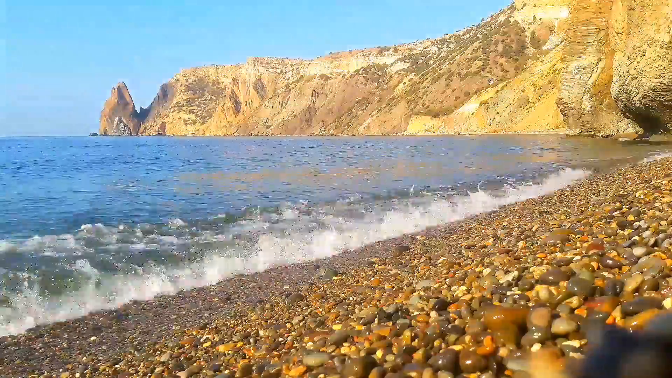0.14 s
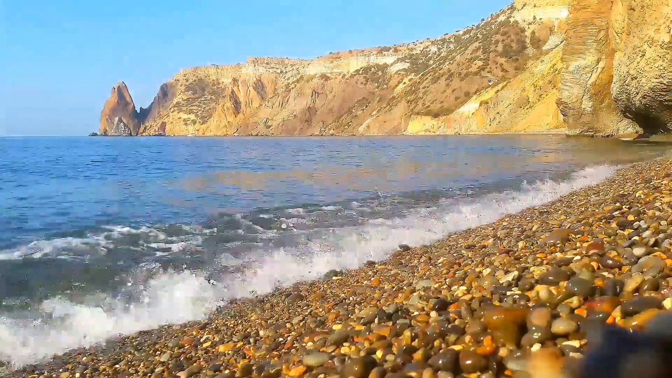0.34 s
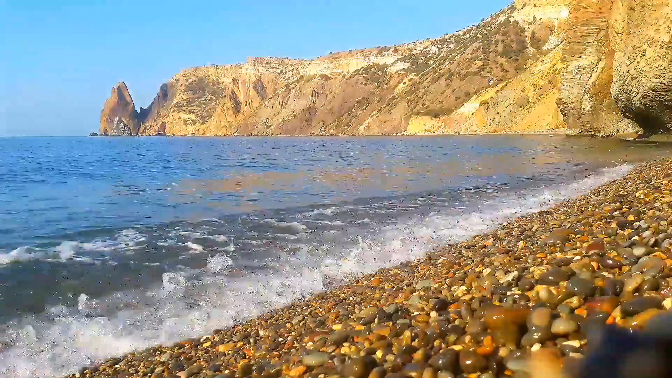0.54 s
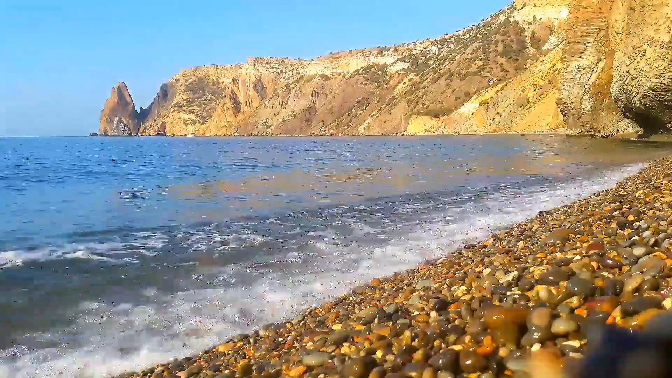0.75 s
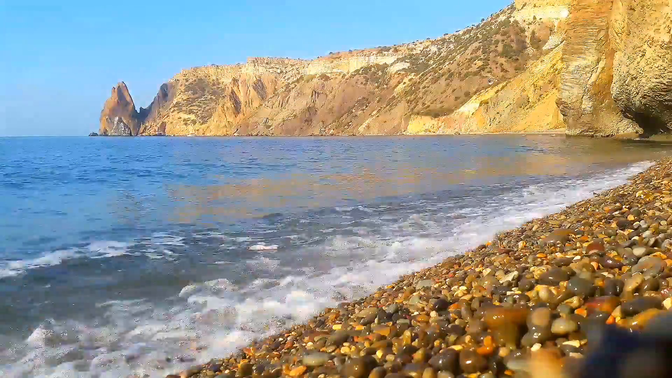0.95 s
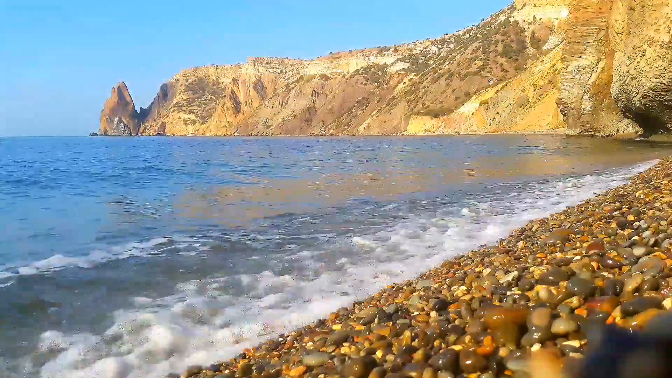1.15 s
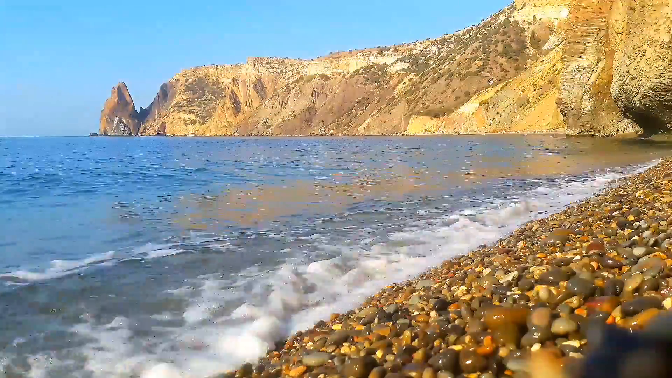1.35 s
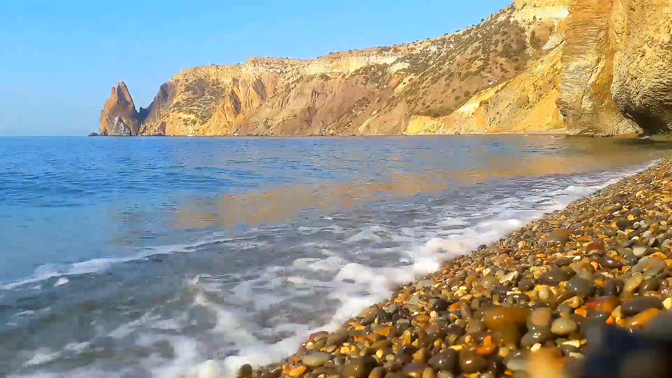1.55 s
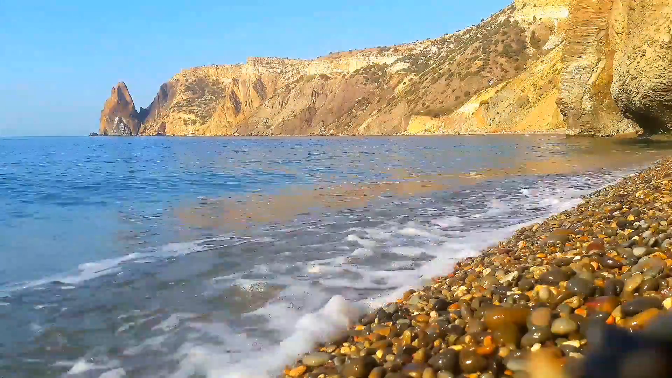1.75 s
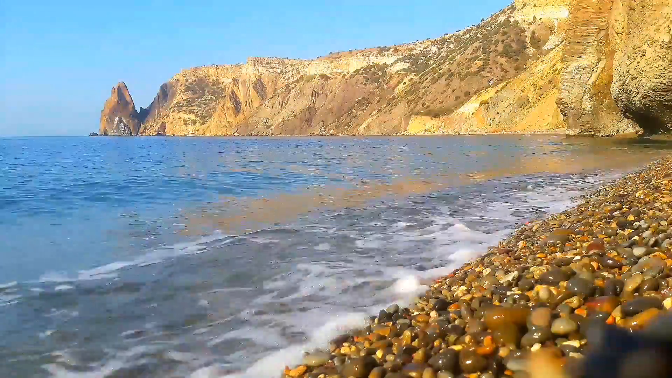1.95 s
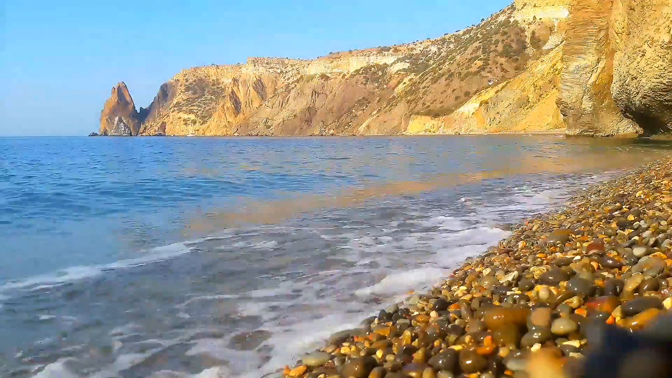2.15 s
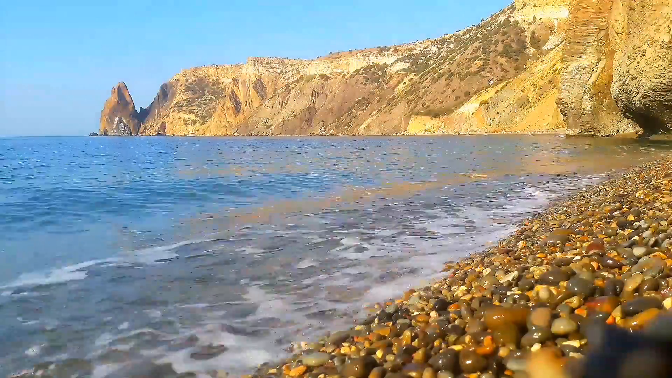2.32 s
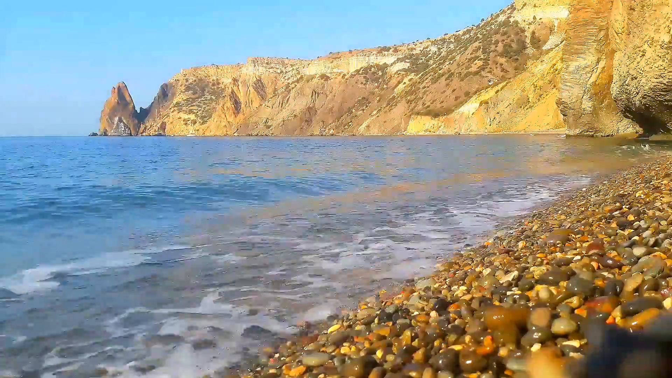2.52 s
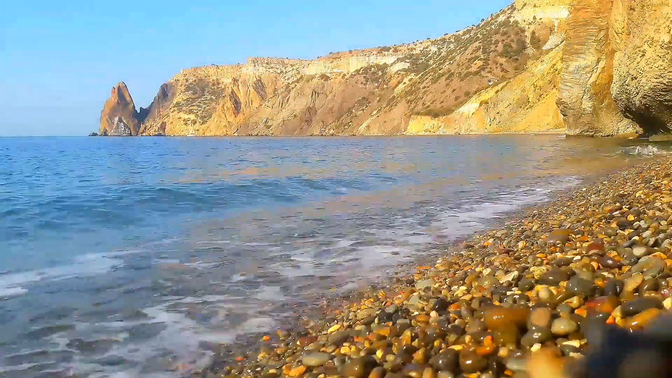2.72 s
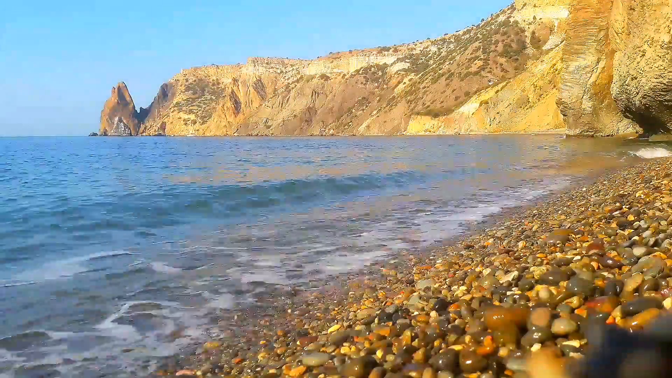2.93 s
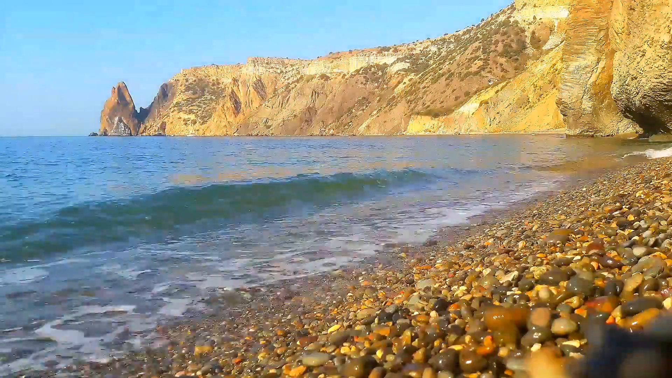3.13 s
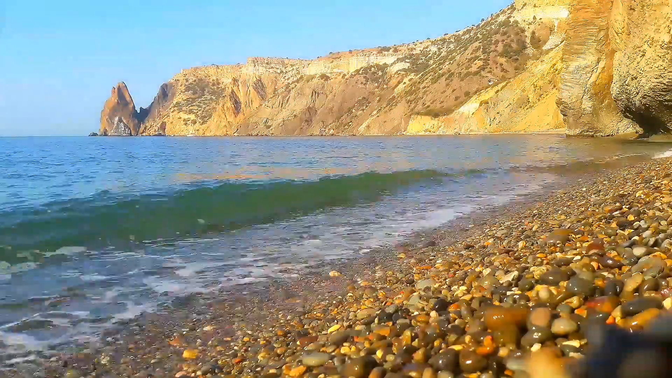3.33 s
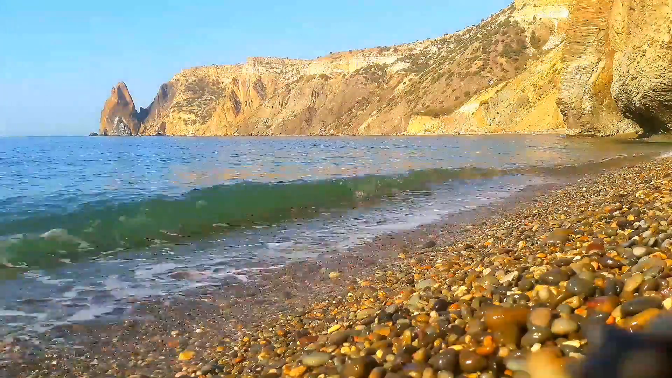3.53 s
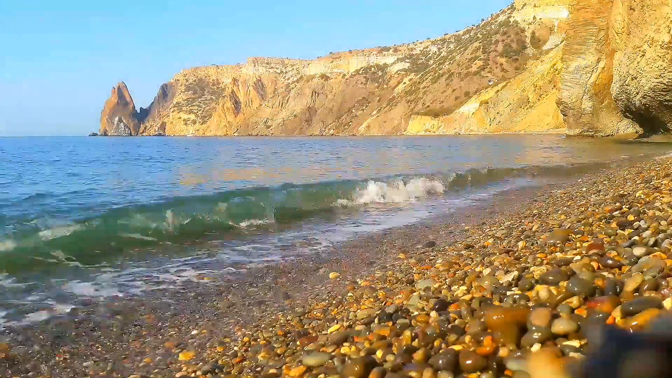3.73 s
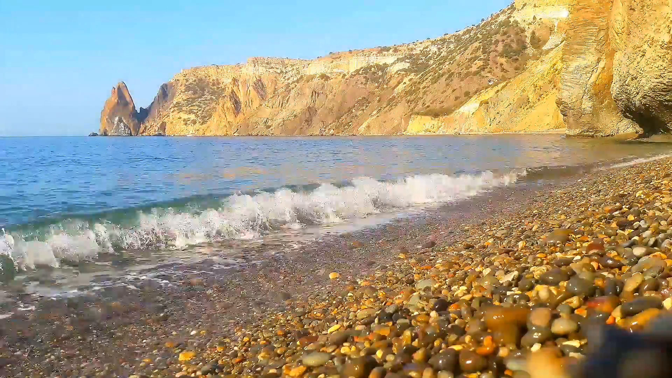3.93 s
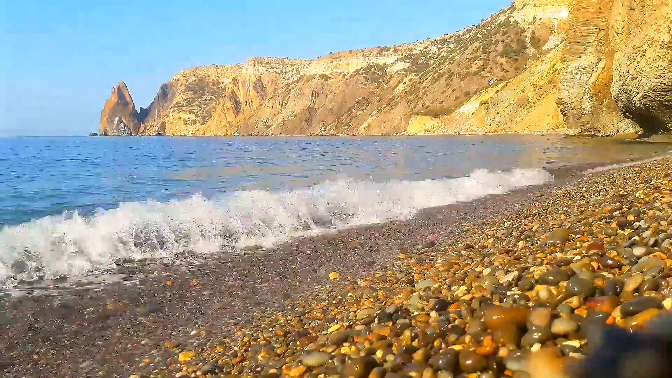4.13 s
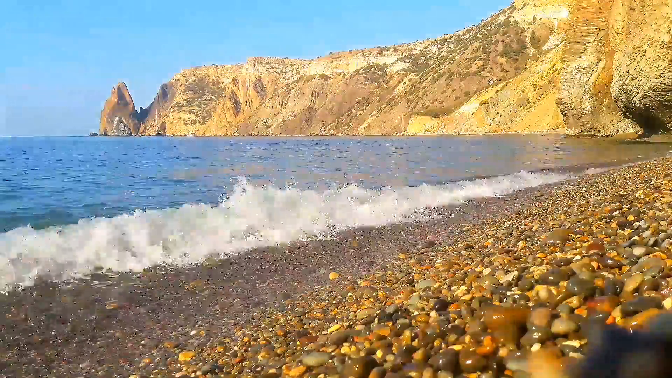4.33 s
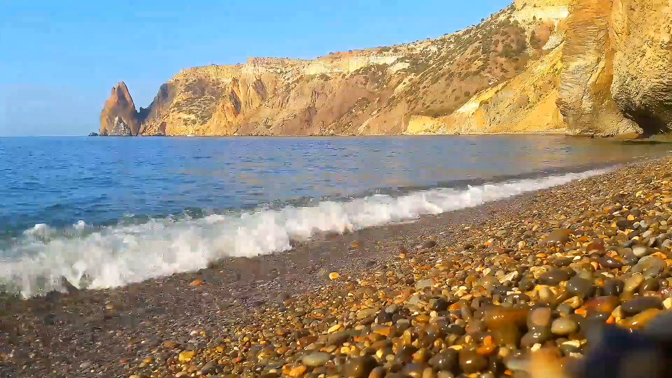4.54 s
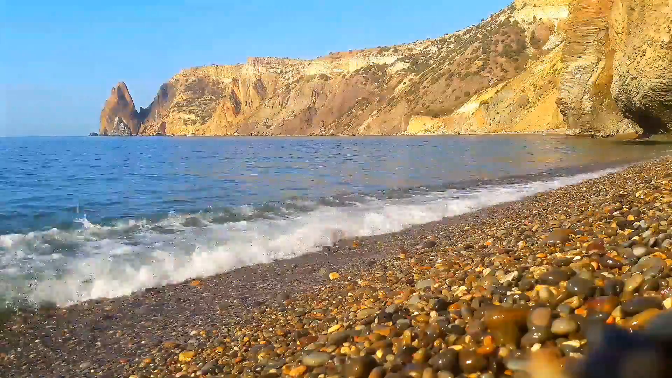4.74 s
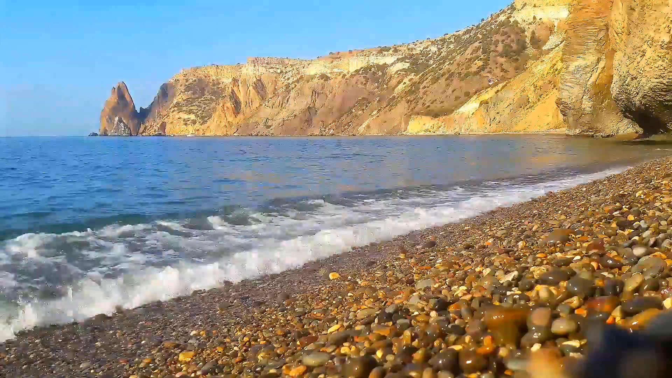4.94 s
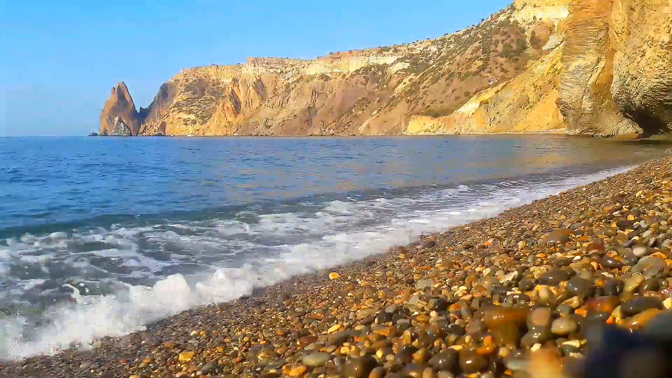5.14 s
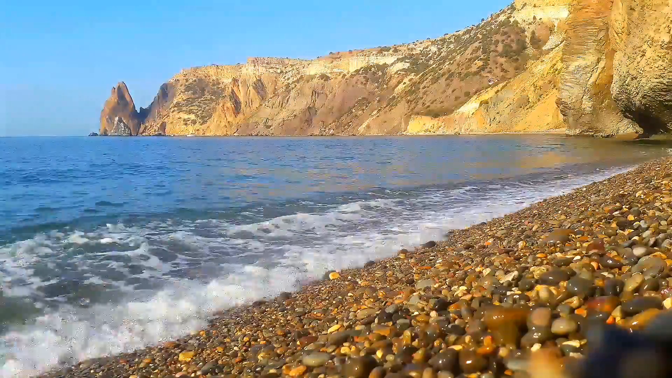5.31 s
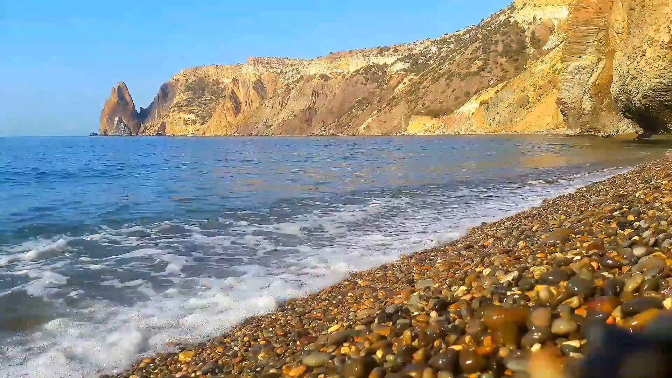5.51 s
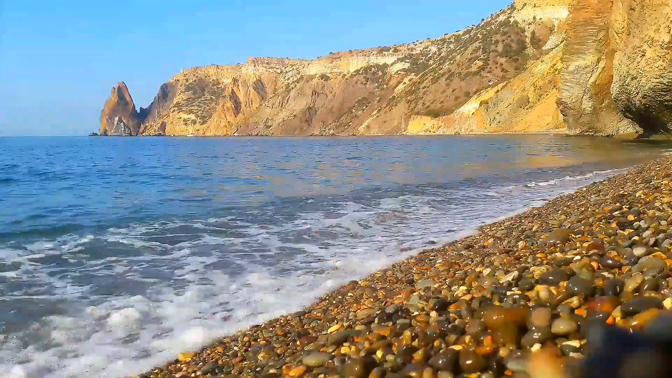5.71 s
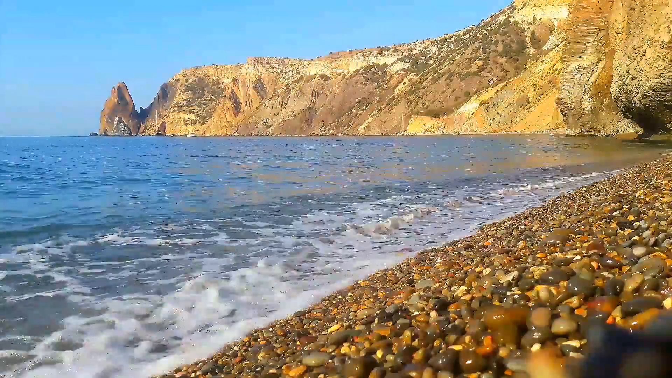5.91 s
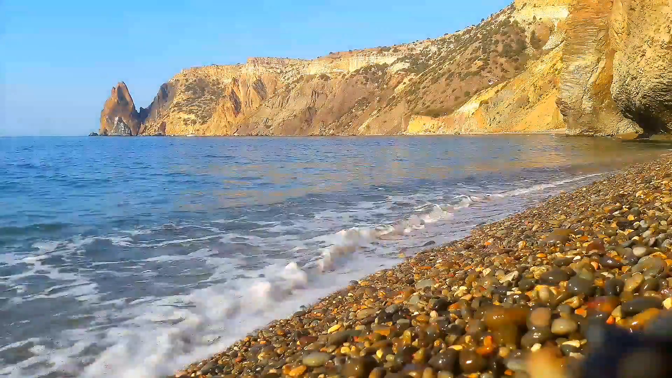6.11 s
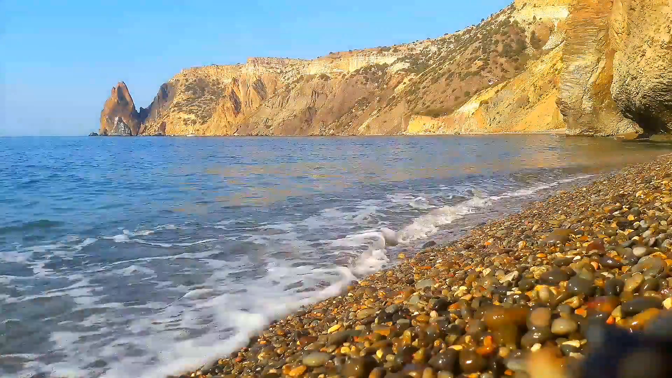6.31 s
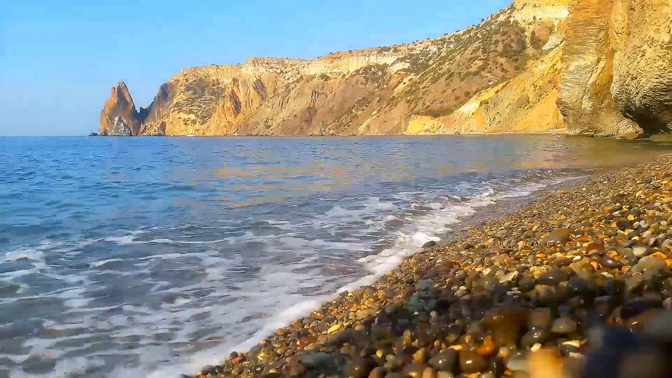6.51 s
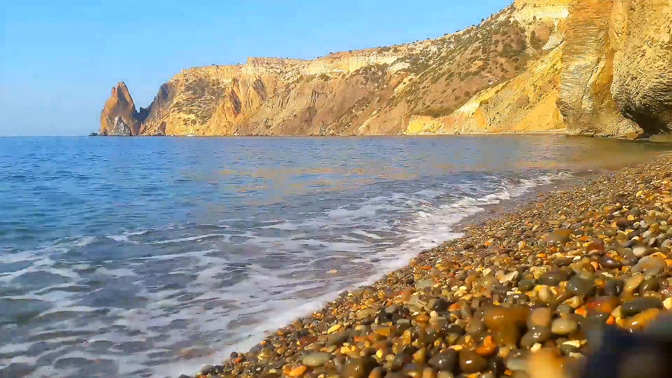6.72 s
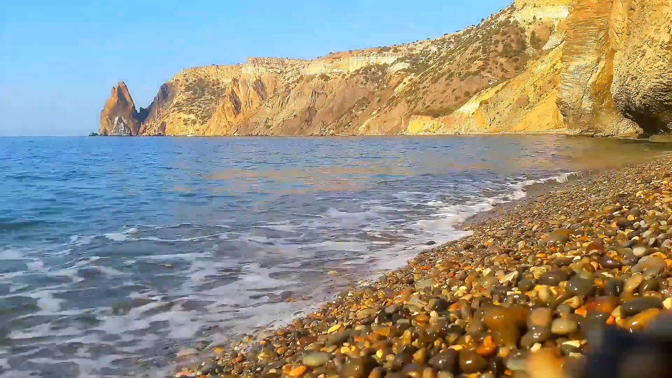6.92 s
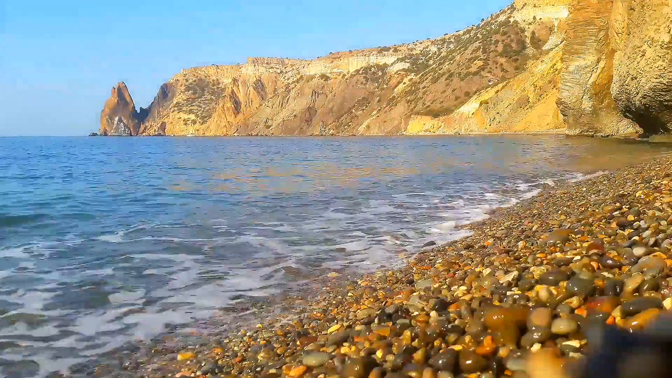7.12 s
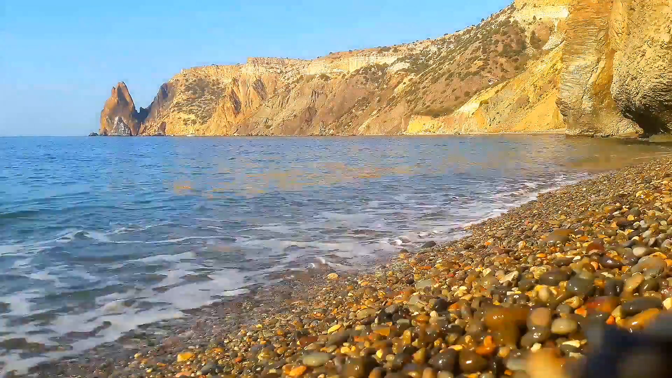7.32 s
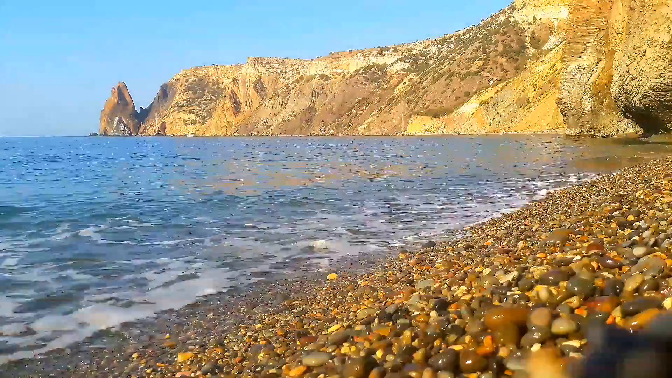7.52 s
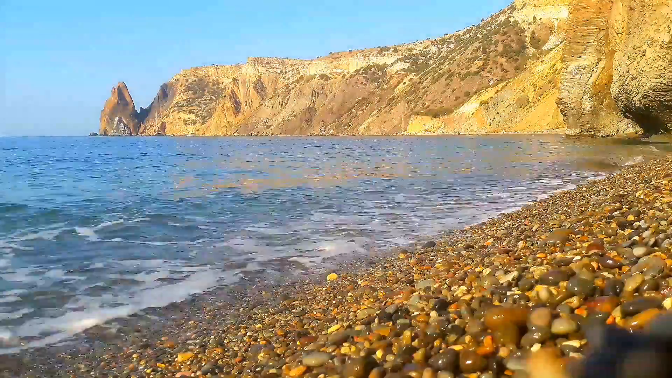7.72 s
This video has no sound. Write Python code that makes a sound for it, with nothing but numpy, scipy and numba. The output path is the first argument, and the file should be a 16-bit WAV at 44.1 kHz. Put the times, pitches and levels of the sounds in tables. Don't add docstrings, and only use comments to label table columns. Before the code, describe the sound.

Small sea waves break and wash over a pebble beach, roaring twice, with rattling stones, gurgling bubbles and fizzing foam between.

```python
import sys
import numpy as np
from scipy import signal
from scipy.fft import rfft, irfft, next_fast_len
from scipy.io import wavfile
from scipy.ndimage import uniform_filter1d
from numba import njit

SR = 44100
rng = np.random.default_rng(int(sys.argv[2]) if len(sys.argv) > 2 else 0)


def file_out(sig):
    cols = np.atleast_2d(sig).T
    lim = np.clip(cols, -1, 1)
    pcm = np.round(lim * 32767).astype(np.int16)
    wavfile.write(sys.argv[1], SR, pcm)


def volts_from_decibels(level):
    exponent = np.asarray(level, float) / 20
    return 10 ** exponent


N = 342216
T = np.arange(N) / SR
MS = T[::44]
PORT_LAG = 18.5
ECHO_LAG = 500

# t/s, water/0-1, pebbles/0-1
SHORE_WIDTH = [(0, 0.78, 0.65), (1.1, 0.58, 0.54), (1.25, 0.14, 0.06), (1.9, 0.6, 0.34), (2.8, 1, 0.22),
               (3.4, 0.7, 0.13), (3.68, 0.8, 0.2), (3.8, 0.94, 0.76), (4.7, 0.29, 0.53), (5.0, 0.43, 0.34),
               (5.5, 0.03, 0.02), (6.15, 0.5, 0.25), (7.2, 0.79, 0.35), (7.76, 1, .2)]


def curves(table):
    s, *columns = np.transpose(table)
    return [np.interp(T, s, c) for c in columns]


def unit(x):
    return x / np.sqrt(np.mean(x ** 2))


def colour(x, points):
    hz, db = np.transpose(points)
    size = next_fast_len(N)
    f = np.arange(1, size // 2 + 2) * SR / size
    gain = volts_from_decibels(np.interp(np.log(f), np.log(hz), db))
    return irfft(rfft(x, size) * gain, size)[..., :N]


def walk(rate):
    k = int(SR / rate)
    steps = rng.standard_normal(N // 200)
    held = steps[np.arange(N) // k]
    return unit(uniform_filter1d(uniform_filter1d(held, k), k))


def surges(s, hold_s, rise, db, fall):
    s, hold_s, rise, db = (np.reshape(c + 0 * s, (-1, 1)) for c in (s, hold_s, rise, db))
    before = np.maximum(s - MS, 0)
    after = np.maximum(MS - s - hold_s, 0)
    return volts_from_decibels(db - rise * before - fall * after) ** 2


def total_db(power, far_db):
    return np.interp(T, MS, 10 * np.log10(power.sum(axis=0) + volts_from_decibels(far_db) ** 2))


@njit
def rings(at, hz, cycles, size, right, lag, glide, n, pad):
    out = np.zeros((2, n + 2 * pad))
    for g in range(len(at)):
        w = 2 * np.pi * hz[g] / SR
        fade = hz[g] / cycles[g] / SR
        z = size[g] + 0j
        turn = np.exp(1j * w - fade)
        bend = np.exp(1j * w * glide[g] * fade)
        soft, onset = 1., np.exp(-w / 2)
        for i in range(at[g], min(at[g] + int(4.5 / fade), n)):
            v = z.imag * (1 - soft)
            out[0, i + pad] += v
            out[1, i + pad + lag[g]] += v * right[g]
            z *= turn
            turn *= bend
            soft *= onset
    return out[:, pad:n + pad]


def swarm(count, hz, octaves, cycles, scatter_db, glide, spread, stray, shade_db):
    when, where, tail, path = rng.random((count, 4)).T
    at = (when * N).astype(np.int64)
    pitch = (hz + 0 * T)[at] * 2 ** (octaves * rng.standard_normal(count))
    pitch = np.clip(pitch, 40, .4 * SR)
    end_on = np.cos(np.pi * np.clip(spread[at], 0, 1) * where)
    lag = np.where(path < stray, ECHO_LAG * (2 * where - 1), PORT_LAG * end_on)
    lag = np.round(lag).astype(np.int64)
    size = np.sqrt(pitch) * volts_from_decibels(scatter_db * np.minimum(-np.log(1 - tail), 4.5))
    right = volts_from_decibels(-shade_db * end_on)
    return unit(rings(at, pitch, cycles + 0 * tail, size, right, lag, glide + 0 * tail, N, ECHO_LAG))


def hits(table, gain_db, cycles, glide, lag, shade_db):
    s, db, hz = np.transpose(table)[:3]
    at = (s * SR).astype(np.int64)
    right = volts_from_decibels(0 * s - shade_db)
    lags = np.full(len(s), int(lag))
    return rings(at, hz, cycles + 0 * s, volts_from_decibels(db + gain_db), right, lags, glide + 0 * s, N, ECHO_LAG)


def surf():
    # arrives t/s, holds/s, rise/(dB/s), roar level/dB, wash level/dB
    breaks = [(0.237, 0.099, 24, -28, -24), (0.542, 0.21, 25, -33.5, -28.5), (0.85, 0.17, 25, -42, -33.5),
              (1.21, 0.24, 307, -38, -29), (1.498, 0.055, 60, -36.5, -41), (1.704, 0.077, 52, -54, -39.5),
              (1.957, .03, 36, -52.5, -57), (2.562, 0.23, 34, -50, -45), (2.997, 0.3, 13, -46, -48),
              (3.45, 0.12, 18, -54, -52), (3.83, 0.057, 297, -33.5, -33.5), (3.735, .04, 203, -61, -36),
              (3.947, 0.099, 110, -46, -27), (4.191, 0.23, 45, -27, -28), (4.42, 0.087, 44, -23.5, -24),
              (4.682, 0.061, 26, -34, -30), (4.97, 0.22, 161, -38, -25), (5.174, 0.2, 42, -29, -24),
              (5.546, 0.074, 33, -43, -33.5), (6.155, 0.36, 34, -46, -46), (6.55, 0.33, 18, -45.5, -49),
              (6.995, 0.11, 12, -53.5, -49), (7.35, .15, 17, -52, -53), (7.68, .05, 23, -47, -55)]
    # t/s, pitch shift/octaves
    bubble_pitch = [(0, -0.02), (.3, -0.031), (.7, 0.06), (1.05, 0.16), (1.3, -0.035), (2.0, 0.06),
                    (2.9, -0.05), (3.3, -0.53), (3.66, -0.68), (3.72, .5), (3.85, 0.04), (4.3, -0.08),
                    (4.7, -0.11), (4.95, 0.01), (5.25, -0.08), (5.6, 0.01), (5.9, 0.07), (6.2, -0.15),
                    (7.0, -0.18), (7.76, -0.07)]
    s, hold_s, rise, roar_db, wash_db = np.transpose(breaks)
    boom_late_s, boom_under_roar_db = 0.041, 14.5
    boom_power = surges(s + boom_late_s, hold_s, rise, roar_db - boom_under_roar_db, fall=62)
    boom_level = total_db(boom_power, far_db=-63)
    roar_level = total_db(surges(s, hold_s, rise, roar_db, fall=66), far_db=-73.5)
    wash_level = total_db(surges(s, hold_s, rise, wash_db, fall=34.5), far_db=-53.5)

    wide = curves(SHORE_WIDTH)[0]
    boom = swarm(count=1200, hz=132.5, octaves=0.31, cycles=1.3, scatter_db=1.8, glide=.03,
                 spread=wide, stray=0.088, shade_db=.4)
    roar = swarm(count=12000, hz=383.4, octaves=0.567, cycles=2.3, scatter_db=1.25, glide=0.092,
                 spread=1.02 * wide, stray=.08, shade_db=0.5)
    wash_hz = 931 * 2 ** curves(bubble_pitch)[0]
    wash = swarm(count=26000, hz=wash_hz, octaves=0.509, cycles=1.9, scatter_db=0.46, glide=0.052,
                 spread=0.83 * wide, stray=.14, shade_db=2.0)

    churn = 0.4 * walk(7.1)
    boom = boom * volts_from_decibels(boom_level + 2.1 * walk(16))
    roar = roar * volts_from_decibels(roar_level + churn + 1.14 * walk(14))
    wash = wash * volts_from_decibels(wash_level + 1.5 + churn)
    return boom + roar + wash


def air_pockets():
    # t/s, peak/dB, f/Hz, fade/cycles
    thumps = [(0.09, -16.5, 97, 1.4), (0.201, -22, 118, 2.7), (.227, -10, 390, 5.8),
              (0.302, -7.5, 425, 3.2), (.449, -14.5, 215, 4.5), (.534, -9.5, 310, 5.3),
              (.675, -22, 96.5, 2.7), (0.854, -20, 89.5, 0.85), (1.23, -12, 202, 1.9),
              (1.227, -18, 133, 1.3), (1.365, -21, 90, 1.6), (1.413, -18, 109, 1.2),
              (2.09, -27.5, 109, 1.4), (2.549, -33, 106, 4.9), (3.01, -27, 120, 1.4),
              (3.811, -14, 316, 1.7), (3.764, -32, 161, 1.8), (3.858, -22, 170, 2), (3.893, -18, 130, 1.6),
              (3.972, -19, 140, 1.8), (4.04, -16, 160, 2.7), (4.072, -17, 144, 2.4), (4.04, -14, 394, 7.3),
              (4.148, -40, 266, 2.2), (4.2, -13, 117, 1.7), (4.42, -24, 114, 1.9), (4.456, -6, 230, 4.4),
              (5.022, -15, 220, 6.3), (5.065, -12, 258, 3.5), (5.1, -13, 259, 4.5), (5.177, -17, 149, 3.1),
              (5.216, -16, 148, 4.3), (5.222, -9, 400, 6.1), (5.355, -24, 110, 2.1), (5.375, -16, 169, 3.1),
              (6.589, -26, 94.5, 1.2), (6.77, -32, 100, 1.7), (7.35, -40, 121, 1.8), (7.701, -36, 109, 2.5)]
    # t/s, peak/dB, f/Hz
    gurgles = [(0.025, -16, 630), (0.097, -9, 880), (0.179, -23, 550), (0.208, -17, 673), (0.24, -4, 1025),
               (0.294, -20, 501), (0.473, -23, 703), (0.496, -16, 544), (0.579, -11, 794),
               (1.008, -27, 1100), (1.032, -23, 1340), (1.413, -21, 505), (1.711, -16, 1440),
               (1.855, -27, 1060), (1.888, -27, 670), (1.949, -33, 818), (2.394, -31, 775),
               (2.436, -28, 797), (2.491, -36, 568), (2.615, -34, 1200), (2.797, -33, 1390),
               (3.521, -28, 1460), (3.69, -28, 1270), (3.786, -26, 1360), (3.873, -12.5, 606),
               (3.942, -12, 770), (4.199, -8, 730), (4.271, -11, 535), (4.302, -14, 807), (4.366, -10, 517),
               (4.457, -15, 710), (4.505, -16, 557), (4.526, -18, 778), (4.725, -13.5, 560),
               (4.822, -15.5, 514), (4.941, -23, 516), (4.972, -17, 1120), (5.015, -15, 563),
               (5.318, -20, 568), (5.414, -18, 743), (5.676, -23.5, 725), (5.754, -26, 1360),
               (5.976, -31, 587), (6.371, -29, 600)]
    # t/s, peak/dB, f/Hz
    pockets = [(.005, -19, 290), (.045, -13, 317), (.138, -17, 471), (.192, -15, 147), (.374, -15, 350),
               (.504, -13, 331), (.646, -22, 223), (1.017, -30, 457), (1.295, -16, 480), (1.559, -23, 258),
               (2.717, -30, 415), (2.856, -32, 364), (3.878, -22, 385), (4.006, -16, 498),
               (4.158, -17, 121), (4.226, -18, 350), (4.275, -11, 207), (4.322, -9, 340),
               (4.394, -12.5, 159), (4.399, -8, 470), (4.494, -11, 334), (4.653, -18, 498),
               (4.698, -18, 400), (4.763, -31, 152), (4.901, -22, 409), (5.166, -13, 323),
               (5.305, -17, 393), (5.465, -23, 450), (5.517, -23, 242), (5.674, -27, 487),
               (6.479, -29, 433), (6.537, -28, 382), (6.578, -30, 297), (6.646, -38, 145), (7.33, -29, 700),
               (7.44, -33, 420)]
    fade_cycles = np.transpose(thumps)[3]
    out = hits(thumps, gain_db=-7.5, cycles=fade_cycles, glide=0.1, lag=7.0, shade_db=2.0)
    out = out + hits(gurgles, gain_db=-5.5, cycles=5.2, glide=.06, lag=7.7, shade_db=3.5)
    return out + hits(pockets, gain_db=-7, cycles=2.9, glide=0.073, lag=12.5, shade_db=1.0)


def pebbles():
    # arrives t/s, holds/s, rise/(dB/s), level/dB, f/Hz
    drags = [(0, 0.74, 22, -28.5, 1760), (0.894, 0.13, 24, -30.5, 1820), (1.168, 0.18, 203, -28, 1910),
             (1.5, 0.034, 60, -26, 1910), (1.635, 0.05, 27, -27.5, 1800), (1.953, 0.039, 41, -35, 1900),
             (2.15, .05, 19, -59, 2100), (2.55, 0.096, 47, -43.5, 2050), (2.806, 0.13, 45, -38.5, 2200),
             (3.064, 0.16, 29, -32.5, 2260), (3.343, 0.12, 20, -36.5, 2500), (3.685, .05, 60, -46, 2260),
             (3.835, 0.047, 56, -31, 1780), (4.137, 0.42, 47, -29, 1760), (4.805, .12, 20, -30.5, 1700),
             (4.998, .25, 212, -25.5, 1800), (5.446, 0.14, 8, -29.5, 1490), (5.737, 0.11, 11, -32.5, 1770),
             (5.99, 0.035, 31, -43, 2000), (6.303, 0.4, 33, -48.5, 1820), (6.85, 0.23, 17, -55, 1900),
             (7.21, .56, 50, -51, 2300)]
    # f/Hz, gain/dB
    stone_body = [(500, -11), (1000, -4), (1350, -0.5), (1700, -0.5), (2600, -1), (3300, -1.5),
                  (4200, -0.5), (6500, -0.5)]
    far_db, far_hz = -58.5, 1900
    s, hold_s, rise, db, hz = np.transpose(drags)
    power = surges(s, hold_s, rise, db, fall=46.5)
    level = total_db(power, far_db)
    weighted = total_db(power * hz[:, None] / far_hz, far_db)
    ring_hz = volts_from_decibels(weighted - level) ** 2 * far_hz
    rattle = swarm(count=46000, hz=ring_hz, octaves=0.37, cycles=1.53, scatter_db=0.5, glide=0,
                   spread=curves(SHORE_WIDTH)[1], stray=.2, shade_db=4.0)
    return unit(colour(rattle, stone_body)) * volts_from_decibels(level + 2.5 + 0.1 * walk(10))


def knocks():
    # t/s, peak/dB, f/Hz
    clacks = [(0.1854, -18, 2350), (0.191, -22, 2070), (1.0101, -24, 1700), (1.7609, -29, 1890),
              (2.0862, -34, 2080), (2.5551, -30, 2320), (2.7197, -32, 1900), (2.7626, -33, 2360),
              (2.8804, -22, 2000), (0.4903, -24, 1670), (0.602, -25, 1590), (0.8535, -22, 2650),
              (1.1677, -17, 1700), (1.2925, -28, 2290), (1.481, -20, 2130), (1.8183, -28, 1970),
              (2.4673, -32, 2580), (2.8015, -30, 2180), (2.9178, -33, 2200), (3.0629, -29, 2230),
              (3.0944, -25, 2390), (3.2186, -27, 2260), (3.308, -25, 2600), (3.7165, -26, 1500),
              (4.367, -14, 1530), (4.9157, -18, 2170), (5.4455, -19, 1670), (5.6206, -29, 2050),
              (6.0626, -41, 2103), (3.6521, -29, 2100), (3.6909, -14.5, 2640), (3.6964, -16, 2870),
              (3.8232, -17, 1830), (4.0472, -22, 1660), (4.0791, -20, 2280), (4.9884, -29, 1690),
              (5.1402, -16, 2060), (5.2455, -22, 2010), (5.5153, -27, 1630), (5.6466, -22, 1720),
              (5.7229, -18, 1967), (5.7723, -21, 1950), (4.99, -20, 2900), (5.028, -22, 3300),
              (6.253, -44, 2090), (6.4141, -39, 2200), (6.6626, -42, 2380), (7.1869, -40, 2450),
              (7.5805, -36, 2570), (7.6289, -42, 2390), (7.2025, -35, 2650), (7.2494, -36, 2500),
              (7.3394, -42, 2260), (7.3794, -33, 2940), (7.5787, -34, 1730), (7.6774, -37, 2320)]
    # t/s, peak/dB, f/Hz
    drip = [
        (7.537, -30, 3080),
    ]
    stones = hits(clacks, gain_db=4, cycles=3.5, glide=0, lag=18, shade_db=1.5)
    return stones + hits(drip, gain_db=0, cycles=14, glide=.22, lag=18, shade_db=1.5)


def foam():
    # arrives t/s, holds/s, rise/(dB/s), level/dB, shade at the right port/dB
    sheets = [(0, 0.055, 22, -40.5, -1), (0.24, 0.065, 74, -36, 1.5), (0.447, 0.14, 20, -40, 18),
              (0.798, 0.12, 20, -55, 18), (1.183, 0.078, 300, -38.5, 37), (1.33, 0.26, 53, -45, 36),
              (1.615, 0.042, 30, -52, 34), (1.93, 0.062, 27, -52.5, 31), (2.25, .25, 23, -62, 18),
              (2.63, 0.19, 50, -51, 27), (2.95, 0.11, 20, -50, 29), (3.255, 0.47, 20, -42, 22),
              (3.72, .08, 144, -52, 3), (3.836, 0.056, 150, -44.5, -2), (4.0, 0.091, 40, -46.5, 6),
              (4.222, 0.37, 23, -39.5, 2.5), (4.8, 0.084, 31, -42.5, 4.5), (4.982, 0.045, 220, -37, 7),
              (5.122, 0.2, 60, -37, 13), (5.404, 0.15, 22, -48, 26), (5.902, 0.23, 19, -60, 27),
              (6.2, 0.19, 30, -57, 12), (6.45, 0.11, 40, -59, 10), (6.9, .12, 23, -64.5, 12),
              (7.18, 0.23, 66, -58, 10), (7.397, .36, 31, -52.5, 11)]
    # t/s, peak/dB, f/Hz
    pops = [(0.0954, -26, 8550), (1.1604, -25, 10800), (1.4471, -22, 12900), (1.472, -14, 12300),
            (1.4784, -14, 13400), (1.4875, -22, 12500), (1.5344, -42, 8280), (1.6117, -20, 11100),
            (1.7978, -35, 8700), (2.5247, -38, 13400), (2.612, -33, 8450), (2.6893, -36, 8620),
            (2.7786, -22, 9680), (2.7964, -43, 8320), (2.8854, -21, 11400), (5.6884, -38, 12000)]
    # f/Hz, gain/dB
    fizz_tone = [(2000, -16), (3000, 1), (4000, 0), (5000, -4.5), (6300, -4.5), (7550, -8), (8000, -53),
                 (8400, -80)]
    # f/Hz, gain/dB
    spray_tone = [(6800, -42), (7600, -1), (8500, 2), (9800, -3.5), (11800, -1), (13500, -3.5), (15800, -5)]
    # f/Hz, gain/dB
    body_shadow = [(7000, 20), (7800, -22), (8800, -19), (10000, -12), (12000, -10), (15800, -7)]
    s, hold_s, rise, db, shade_db = np.transpose(sheets)
    power = surges(s, hold_s, rise, db, fall=43.5)
    far_spray_db, far_shade_db = -56, 9.5
    fizz_db = total_db(power, far_db=-60.5)
    spray_db = total_db(power, far_spray_db)
    shaded_power = power * volts_from_decibels(-shade_db[:, None]) ** 2
    pan_db = spray_db - total_db(shaded_power, far_spray_db - far_shade_db)

    hiss = rng.standard_normal((2, N))
    burst_db = np.minimum(2.2 * rng.exponential(size=(2, N)), 9) + 9.5
    crackle = (rng.random((2, N)) < .012) * volts_from_decibels(burst_db) * np.sign(hiss)
    flicker = 0.12 * walk(8.5) + 0.81 * walk(24.15)
    fizz = unit(colour(hiss + 0.42 * crackle, fizz_tone)) * volts_from_decibels(fizz_db + 5.0 + flicker)
    spray = unit(colour(hiss + crackle, spray_tone)) * volts_from_decibels(spray_db + 6.0 + flicker + 0.5 * walk(20))
    spray = spray + hits(pops, gain_db=3, cycles=3.5, glide=0, lag=18, shade_db=0)

    right_fizz = 0.9 * fizz[1] + 0.2 * np.roll(fizz[0], int(PORT_LAG))
    right_fizz = right_fizz * volts_from_decibels(-.2 * (pan_db - 3))
    right_spray = colour(spray[1], body_shadow) * volts_from_decibels(-pan_db)
    return np.array([fizz[0] + spray[0], right_fizz + right_spray])


def seepage():
    # t/s, level/dB
    seep_level = [
        (0, -83),
        (5.8, -90),
        (6.1, -59),
        (6.45, -55),
        (6.75, -65),
        (7.0, -72),
        (7.25, -62),
        (7.76, -64),
    ]
    # f/Hz, gain/dB
    seep_tone = [(9800, -25), (10900, -5), (12300, 4), (13800, -11), (15000, -4), (15900, -6)]
    return unit(colour(rng.standard_normal((2, N)), seep_tone)) * volts_from_decibels(curves(seep_level)[0])


def breeze():
    # t/s, level/dB, lasts/s
    puffs = [(.13, -66, .01), (.24, -63, .15), (0.574, -57, .01), (0.702, -66, 0.011), (1.0, -56, 0.056),
             (1.19, -58, 0.38), (2.075, -58.5, 0.07), (2.55, -53, 0.0093), (2.704, -59, .01),
             (3.4, -63, 0.12), (3.86, -58, .2), (4.363, -57, .01), (4.523, -67, .03), (4.686, -61, 0.011),
             (4.84, -67, 0.0083), (5.3, -68, .1), (5.64, -64, .03), (5.863, -62, 0.0088),
             (6.208, -77, 0.08), (6.604, -58, .03), (6.78, -60, 0.02), (7.01, -60, .01), (7.1, -59, 0.014),
             (7.4, -69, .1), (7.72, -59, .03)]
    tone = [(8, -17), (20, -14), (45, -3), (80, -3), (130, -28), (200, -54)]  # f/Hz, gain/dB
    rumble = colour(rng.standard_normal((2, N)), tone)
    s, db, lasts_s = np.transpose(puffs)
    level = total_db(surges(s, lasts_s, 180, db, fall=120), far_db=-75)
    port_db = np.array([[4], [0]])
    return unit(rumble) * volts_from_decibels(level + port_db + 2.1 * walk(14))


def scene():
    # f/Hz, gain/dB
    stone_shadow = [(6500, 0), (7600, -9), (8200, -24), (15800, -16)]
    left, right = surf() + air_pockets() + pebbles() + knocks()
    return np.array([left, colour(right, stone_shadow)]) + foam() + seepage()


def low_pass(x):
    return signal.sosfilt(signal.butter(12, 15848, fs=SR, output="sos"), x)


def record(dry):
    low_cut = signal.butter(4, 85, "high", fs=SR, output="sos")
    mix = signal.sosfilt(low_cut, dry) + breeze() - .0006
    return low_pass(mix)


dry = scene()
out = record(dry)
file_out(out)
```